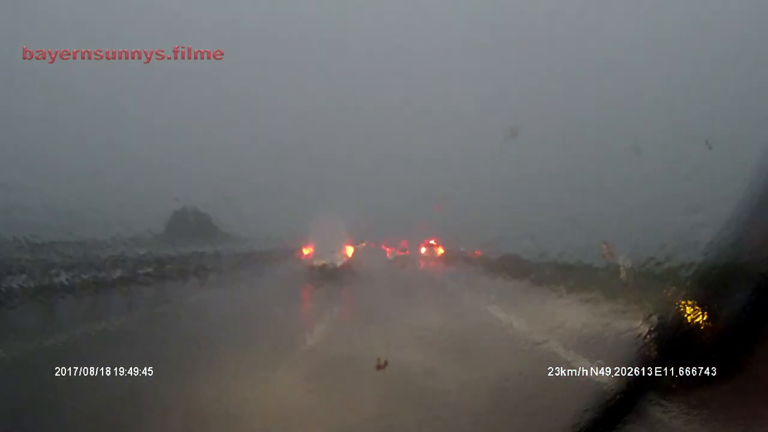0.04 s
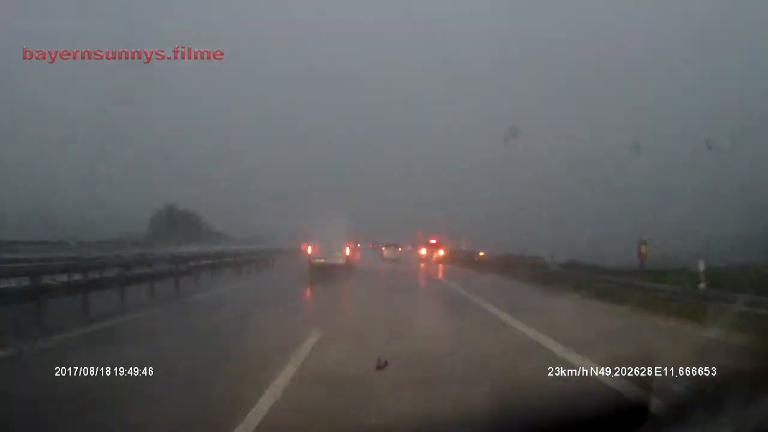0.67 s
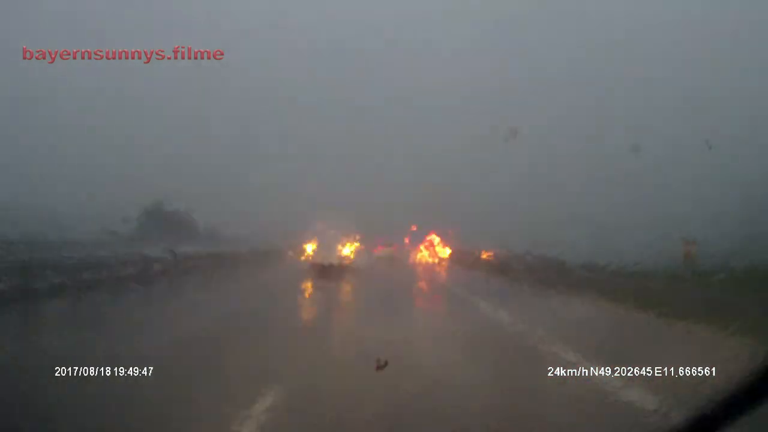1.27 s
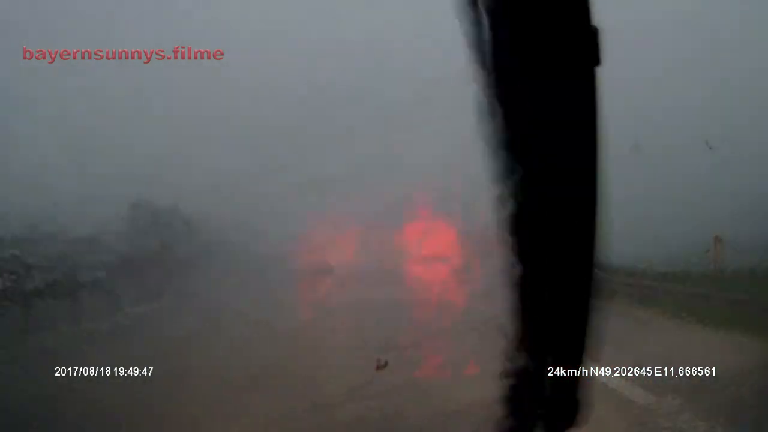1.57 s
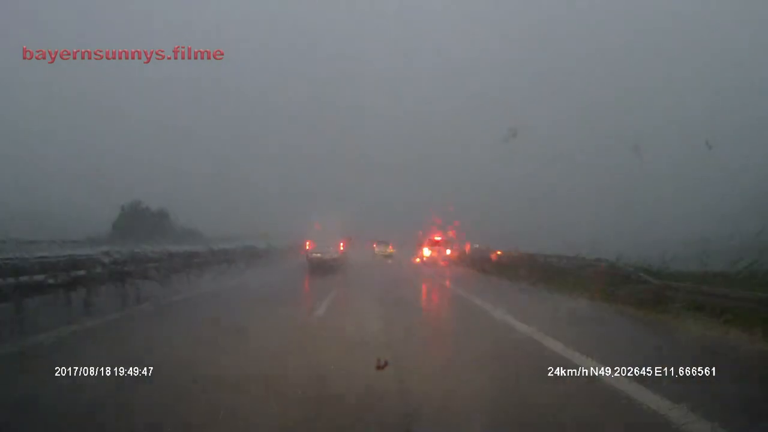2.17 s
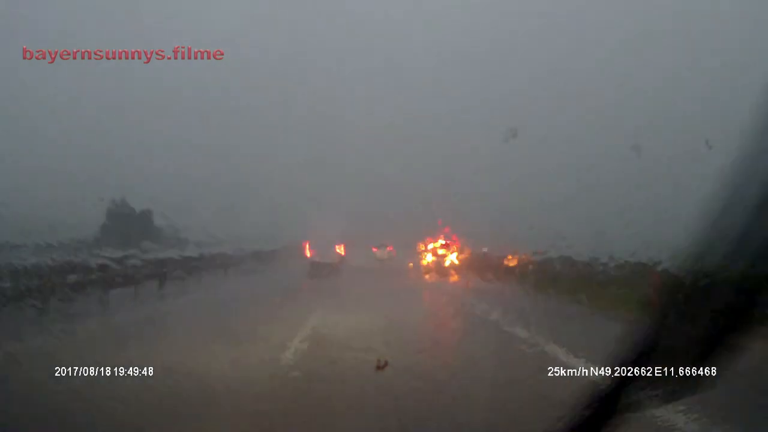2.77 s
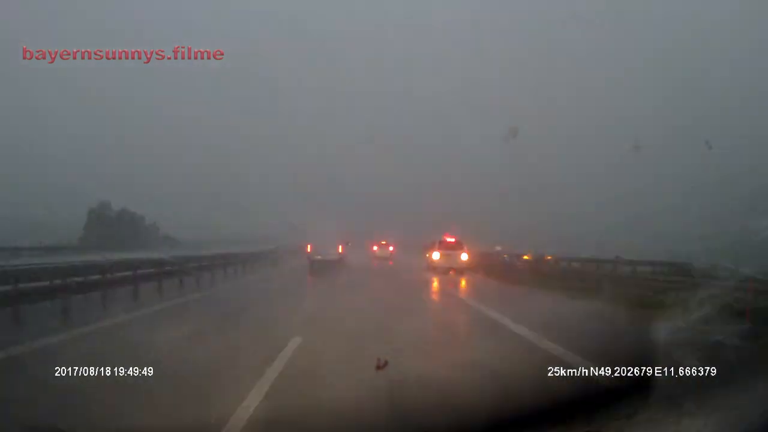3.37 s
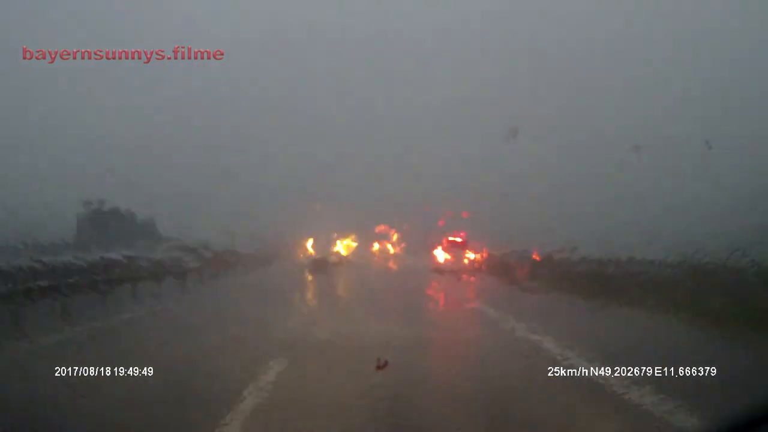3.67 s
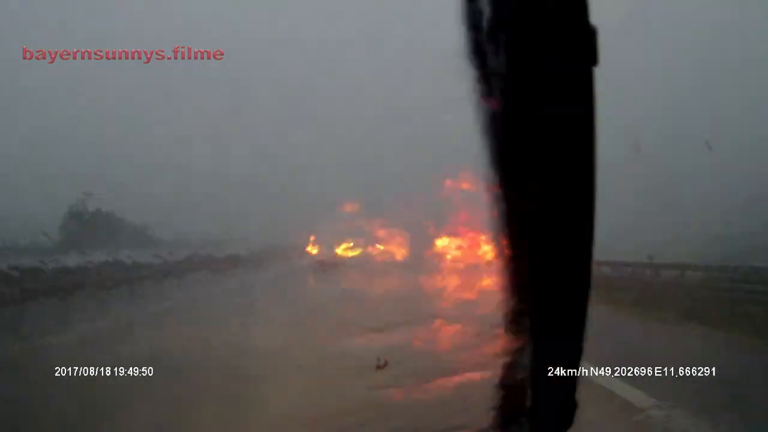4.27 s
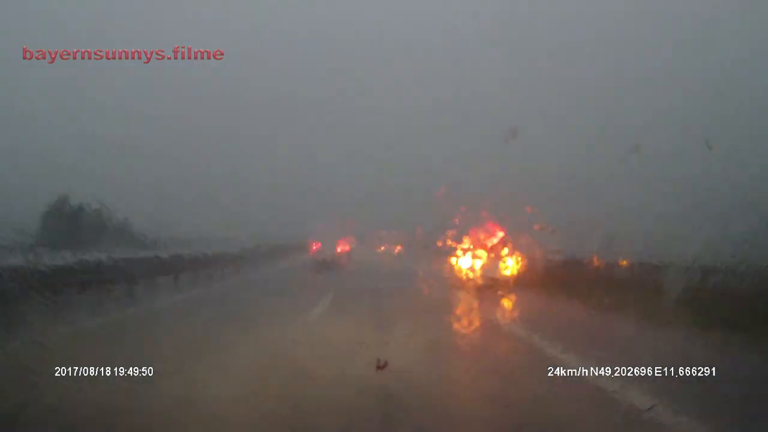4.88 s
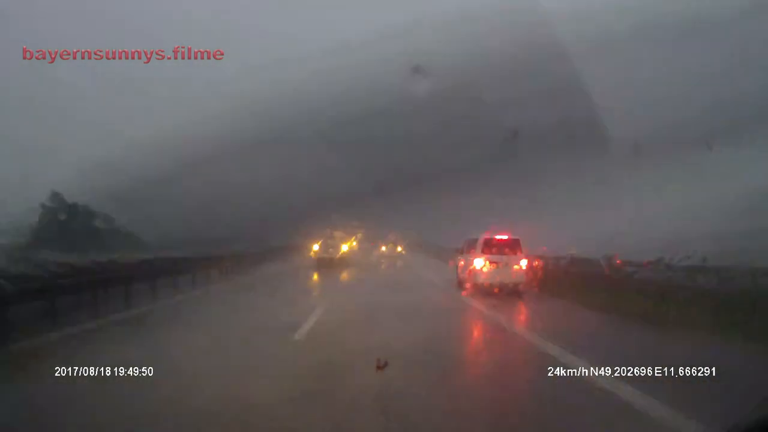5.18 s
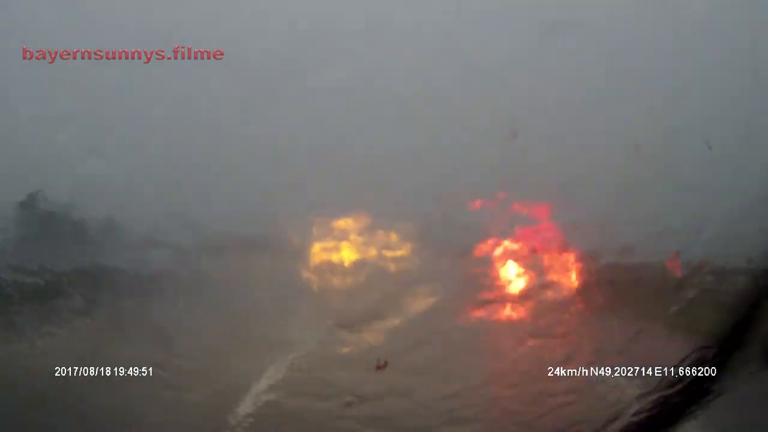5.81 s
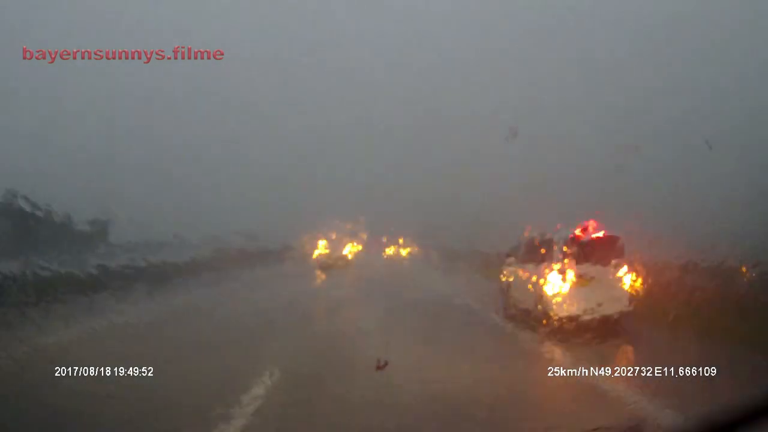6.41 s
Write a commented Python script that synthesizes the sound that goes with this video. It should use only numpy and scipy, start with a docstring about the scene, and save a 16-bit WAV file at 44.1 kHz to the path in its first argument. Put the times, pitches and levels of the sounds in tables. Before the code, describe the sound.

Heavy rain pelts a slowly moving car for about six and a half seconds, heard inside the cabin, close behind the windscreen. A dense, hard patter on the glass blends with duller roof drumming and a fine fizzing spray, over a very faint, steady tyre rumble. A slap of water opens it, and two loud drops hit at about 0.4 seconds. Gusts throw short sheets of rain that swell quickly and drain away, strongest around 0.5, 1.2, 2.2, 3.4, 4.3, 4.9 and 6 seconds, with brief dips near 1.9 and 5.3 seconds. Fat drops crack out irregularly throughout, each a short knock with a bright splash, thickest between 2.6 and 4.2 seconds. More dull slaps of water strike the body near 3.3, 4.1, 4.3, 4.9 and 6.1 seconds. The loudest hits slightly overload the microphone, and the rain is still pouring at the end.

```python
"""Inside a slowly moving car in a downpour, one microphone close behind the windscreen.
Gusts throw sheets of drops on the glass in front and the roof overhead; each drop rings its panel for
a few milliseconds and dies away in the cabin. Fat drops crack out of the patter, masses of water slap
the body, fine spray fizzes on top and the tyres rumble faintly through the floor.
The loudest hits overload the microphone."""
import sys
import numpy as np
from scipy import signal
from scipy.fft import rfft, irfft, next_fast_len
from scipy.io import wavfile
from scipy.ndimage import uniform_filter1d

SR = 44100
rng = np.random.default_rng(int(sys.argv[2]) if len(sys.argv) > 2 else 0)


def dump(signal):
    """Clip the signal to [-1, 1] and save it as 16-bit WAV at the path in sys.argv[1]."""
    limited = np.clip(np.atleast_2d(signal).T, -1, 1)
    pcm = np.round(limited * 32767).astype(np.int16)
    wavfile.write(sys.argv[1], SR, pcm)


N = 284445
TIME = np.arange(N) / SR

# Levels in the tables are relative; each source adds its own gain.
# steady rain between the sheets: time_s, level_db
RAIN_BED = [(0.05, -20), (0.66, -19), (0.76, -23), (1.08, -19.5), (1.5, -21.5), (1.78, -21), (1.88, -29.5),
            (1.96, -23), (2.4, -20), (2.68, -22), (3.16, -21.5), (3.24, -25.5), (3.52, -18), (3.89, -23.5),
            (5.17, -20.5), (5.34, -29), (5.66, -25.5), (6.28, -18)]
# sheets of rain thrown by gusts: start_s, hold_s, level_db
GUST_SHEETS = [(0.168, .24, -18), (0.47, .14, -15.5), (0.872, 0.14, -17), (1.179, 0.046, -12.5),
               (1.376, 0.018, -17.5), (2.041, 0.052, -16), (2.171, 0.067, -14), (3.293, .01, -19),
               (3.356, .08, -13.5), (3.932, .02, -21.5), (4.249, 0.12, -15.5), (4.615, .12, -19.5),
               (4.816, 0.18, -14.5), (5.057, 0.063, -18), (5.72, 0.051, -21.5), (6.001, 0.08, -14),
               (6.188, 0.021, -19), (6.428, .04, -16.5)]
# what the windscreen passes to the microphone: frequency_hz, level_db
GLASS_SPECTRUM = [(100, -41), (500, -12.5), (1200, -5), (1800, 0.5), (2500, -1), (4200, 0), (5200, -4.5),
                  (7000, -9.5), (10000, -24), (15500, -33.5)]
# its resonances and one notch: pitch_hz, width_hz, lift_db
GLASS_RESONANCES = [(1260, 55, 9.5), (2828, 156, 7.5), (3050, 173, 6.5), (3676, 135, 2), (4240, 200, 2.5),
                    (4660, 230, -4)]
# what the lined roof passes into the cabin: frequency_hz, level_db
ROOF_SPECTRUM = [(30, -34.5), (110, -24.5), (160, -20), (300, -14.5), (450, -11), (720, -1.5), (1100, -1.5),
                 (1700, -3.5), (2600, -6), (6000, -48)]
# its resonances: pitch_hz, width_hz, lift_db
ROOF_RESONANCES = [(399, 94, 6), (530, 58, 7.5), (713, 85, 3), (1000, 134, 6), (1225, 90, 4.5)]
# the loudest fat drops on the windscreen: start_s, peak_db, treble_db
LOUD_DROPS = [(0.371, 2, -18), (0.397, 2, -14), (1.389, 0, -18), (1.906, -8, -23), (2.329, -3, -17),
              (2.593, -2, -20), (2.854, 0, -20), (2.872, -3, -19), (3.05, -3, -21), (3.072, -4, -21),
              (3.179, -3, -22), (3.292, -1, -23), (3.343, 1, -17), (3.505, -1, -21), (3.611, -2, -21),
              (3.751, -2, -24), (3.822, -1, -18), (3.979, -4, -19), (4.054, 0, -13), (4.154, -4, -24),
              (4.895, 3, -14), (5.112, 0, -22), (5.402, -5, -26), (5.506, -3, -21), (5.559, -6, -22),
              (5.679, -2, -20), (5.913, -3, -19), (6.113, 2, -20)]
# the splash of a fat drop: frequency_hz, level_db
SPLASH_SPECTRUM = [(500, -32), (2500, -10), (4300, 0), (6500, -1.5), (9000, -10), (12000, -20),
                   (15500, -33)]
# slaps of massed water on the body: start_s, level_db, t60_s, thump_db
BODY_SLAPS = [(0.0, 0, 0.055, -24), (0.371, -20, 0.027, -22.5), (0.399, -11, .04, -20),
              (3.343, -17, .04, -26), (4.057, -15, 0.045, -50), (4.292, -16, .05, -30),
              (4.896, -9, 0.03, -22), (6.114, -12, .04, -49)]
# fine spray: frequency_hz, level_db
SPRAY_SPECTRUM = [(500, -57), (3000, 7), (5300, -1.5), (7000, 1.5), (9000, -7.5), (11000, -11),
                  (13000, -33), (15500, -52)]
# tyres and engine through the floor: frequency_hz, level_db
ROAD_SPECTRUM = [(15, -8), (35, -14), (85, -9), (110, -10.5), (155, 0), (200, -2), (300, -1), (700, -24),
                 (3000, -32)]


def windscreen(glass_db):
    """Hard patter on the glass just ahead of the microphone; countless far drops merge into a wash."""
    per_s = 2000 * from_db(.6 * (glass_db - np.mean(glass_db)))
    drops = shower(per_s, ring_t60_s=.008)
    wash = from_db(-3) * rng.standard_normal(N)
    return from_db(glass_db) * even_out(colour(drops + wash, GLASS_SPECTRUM, GLASS_RESONANCES))


def roof(roof_db):
    """Dull drumming overhead, through the lining: a heavier sheet brings more drops a second."""
    per_s = 2000 * from_db(.5 * (roof_db - np.mean(roof_db)))
    drops = shower(per_s, ring_t60_s=.013)
    wash = from_db(-8.5) * rng.standard_normal(N)
    return from_db(roof_db) * even_out(colour(drops + wash, ROOF_SPECTRUM, ROOF_RESONANCES))


def fat_drops(rain_db):
    """Big drops close to the microphone: a short knock through the pane and a bright, trailing splash."""
    drops = [(start_s, peak_db - 12, treble_db - .7) for start_s, peak_db, treble_db in LOUD_DROPS]
    drops += lesser_drops(rain_db)
    hits = np.array([impact(ring_t60_s=.011, cabin_db=-19) for _ in drops])
    bursts = np.array([impact(ring_t60_s=.012, cabin_db=-13) for _ in drops])
    knocks = colour(low_pass(hits, hz=2050), GLASS_SPECTRUM, GLASS_RESONANCES)
    splashes = colour(bursts, SPLASH_SPECTRUM)
    out = np.zeros(N + SR)
    attack = SR // 250   # the first 4 ms set each drop's level
    for (start_s, knock_db, splash_db), knock, splash in zip(drops, knocks, splashes):
        drop = from_db(knock_db) * knock / np.std(knock[:attack])
        drop += from_db(splash_db) * splash / np.std(splash[:attack])
        start = round(start_s * SR)
        out[start:start + len(drop)] += drop
    return out[:N]


def lesser_drops(rain_db, count=70, spread_db=2.5):
    """Random fat drops that follow the strength of the rain; rows of start_s, knock_db, splash_db."""
    starts = rng.integers(0, N, count)
    size_db = rain_db[starts] + rng.uniform(-spread_db, spread_db, count)
    return list(zip(TIME[starts], size_db + 2.5, size_db - 4))


def slaps(thump_s=.0011):
    """Massed water drives the roof's low modes, with a short low thump as it overloads the microphone."""
    force, thumps = 0, 0
    for start_s, level_db, t60_s, thump_db in BODY_SLAPS:
        age_s = np.maximum(TIME - start_s, 0)
        force += from_db(level_db - 60 * np.minimum(age_s / t60_s, 2)) * (age_s > 0)
        thumps += from_db(thump_db) * age_s / thump_s * np.exp(1 - np.minimum(age_s / thump_s, 100))
    blow = low_pass(force * rng.standard_normal(N), hz=820)   # a soft, wide contact
    thumps = signal.sosfilt(signal.butter(1, 20, "high", fs=SR, output="sos"), thumps)
    return from_db(22) * colour(blow, ROOF_SPECTRUM, ROOF_RESONANCES) + thumps


def spray(spray_db):
    """Small droplets tick briefly and brightly over a fine mist."""
    per_s = 600 * from_db(.7 * (spray_db - np.mean(spray_db)))
    drops = shower(per_s, ring_t60_s=.014)
    mist = from_db(-6) * rng.standard_normal(N)
    return from_db(spray_db) * even_out(colour(drops + mist, SPRAY_SPECTRUM))


def road():
    """Tyres and engine, a low, steady rumble through the floor, far under the rain."""
    return from_db(-44.5) * unit_rms(colour(rng.standard_normal(N), ROAD_SPECTRUM))


def rainfall(swell_db_per_s=229.5, drain_db_per_s=155, scatter_fade_db_per_s=260):
    """Strength of the rain in dB: a steady bed, sheets that swell, hold and drain, and drop scatter."""
    bed_db = np.interp(TIME, *np.transpose(RAIN_BED))
    power = from_db(bed_db) ** 2
    for start_s, hold_s, level_db in GUST_SHEETS:
        before_s = np.maximum(start_s - TIME, 0)
        after_s = np.maximum(TIME - start_s - hold_s, 0)
        power += from_db(level_db - swell_db_per_s * before_s - drain_db_per_s * after_s) ** 2
    # each loud drop bursts into droplets that thicken the patter for a moment
    for start_s, _, treble_db in LOUD_DROPS:
        start = round(start_s * SR)
        power[start:] += from_db(treble_db - 1.7 - scatter_fade_db_per_s * TIME[:N - start]) ** 2
    return 10 * np.log10(power)


def flutter(depth_db, steps_per_s=25):
    """Quick random unevenness of the rain on one surface, in dB."""
    steps = rng.standard_normal(SR // 20)
    return depth_db * np.interp(TIME * steps_per_s, np.arange(len(steps)), steps)


def shower(per_s, ring_t60_s, spread_db=5.5, spots=12):
    """Drops of uneven size land at random on many spots, each with a ring of its own; rms about 1."""
    landed = rng.random(N) < per_s / SR
    sizes = from_db(spread_db * np.clip(rng.standard_normal(N), -2, 2)) * rng.choice([-1, 1], N)
    clicks = landed * unit_rms(sizes) * np.sqrt(SR / per_s)
    spot = rng.integers(0, spots, N)
    return sum(signal.oaconvolve(clicks * (spot == k), impact(ring_t60_s))[:N] for k in range(spots))


def impact(ring_t60_s, cabin_db=-17, cabin_t60_s=.07):
    """One spot's answer to a drop: a burst of dense bending waves, then cabin reflections; energy 1."""
    age_s = TIME[:SR // 10]
    pane, cabin = rng.standard_normal((2, len(age_s)))
    ring = pane * from_db(-60 * age_s / ring_t60_s)
    reflections = cabin * from_db(cabin_db - 60 * age_s / cabin_t60_s)
    wave = ring + reflections
    return wave / np.linalg.norm(wave)


def colour(x, spectrum, resonances=()):
    """Causal (minimum-phase) filter with the given spectrum and resonant humps."""
    length = x.shape[-1]
    size = 2 * next_fast_len(length // 2 + SR // 20)
    hz = np.maximum(np.fft.rfftfreq(size, 1 / SR), 1)
    points_hz, points_db = np.transpose(spectrum)
    gain_db = np.interp(np.log(hz), np.log(points_hz), points_db)
    for pitch_hz, width_hz, lift_db in resonances:
        gain_db += lift_db / (1 + (2 * (hz - pitch_hz) / width_hz) ** 2)
    cepstrum = irfft(np.log(from_db(gain_db)))[:size // 2]
    cepstrum[1:] *= 2   # folding the cepstrum puts all ringing after the hit
    response = np.exp(rfft(cepstrum, size))
    return irfft(rfft(x, size) * response)[..., :length]


def low_pass(x, hz):
    """Gentle second-order low-pass."""
    return signal.sosfilt(signal.butter(2, hz, fs=SR, output="sos"), x)


def even_out(x):
    """Unit level over a twelfth of a second, with the single drops left standing out."""
    return x / np.sqrt(np.abs(uniform_filter1d(x ** 2, size=SR // 12)) + 1e-12)


def unit_rms(x):
    """Scale to an rms of 1."""
    return x / np.sqrt(np.mean(x ** 2) + 1e-20)


def from_db(db):
    """Decibels to gain."""
    return 10 ** (np.asarray(db) / 20)


def scene():
    """The cabin in mono, from behind the glass: one rain drives every surface, over the road noise."""
    rain_db = rainfall()
    patter = (roof(rain_db - 1.5 + flutter(depth_db=1.13))
              + windscreen(rain_db + .33 + flutter(depth_db=2))
              + spray(rain_db - 13.5 + flutter(depth_db=2.9)))
    return (patter + fat_drops(rain_db) + slaps() + road())[None]


def record(dry):
    """The overloaded microphone rounds off the highest peaks; the top treble is cut steeply."""
    ceiling, cutoff_hz = .84, 15650
    rounded = dry / (1 + (dry / ceiling) ** 4) ** (1 / 4)
    return signal.sosfilt(signal.ellip(12, .1, 90, cutoff_hz, fs=SR, output="sos"), rounded)


dry = scene()
out = record(dry)
dump(out)
```